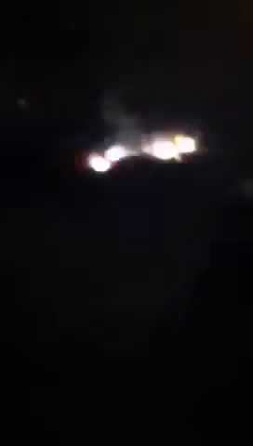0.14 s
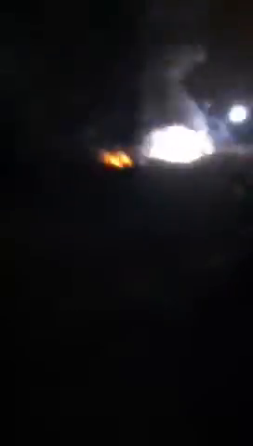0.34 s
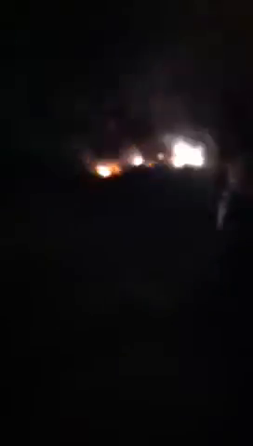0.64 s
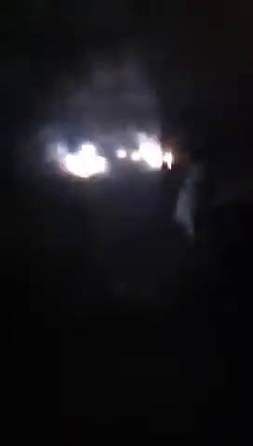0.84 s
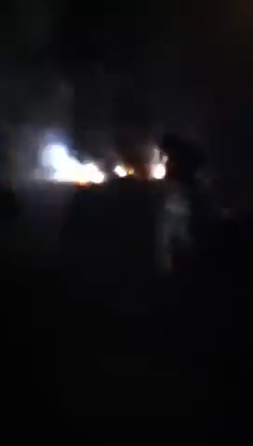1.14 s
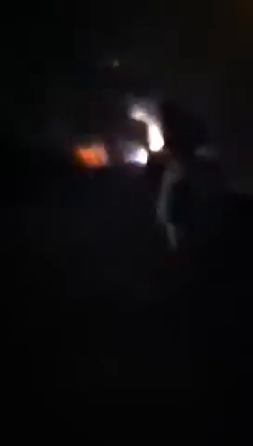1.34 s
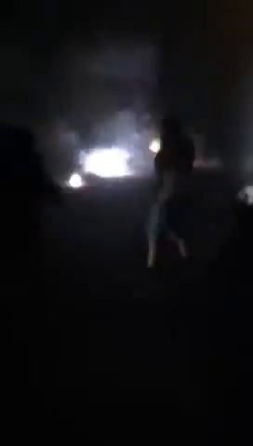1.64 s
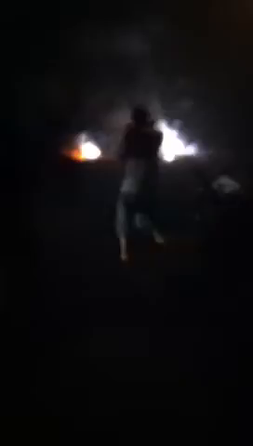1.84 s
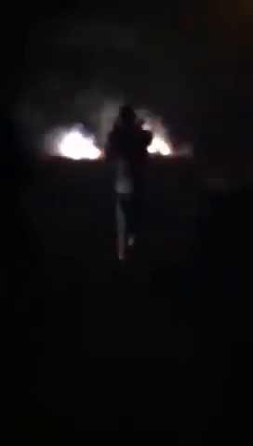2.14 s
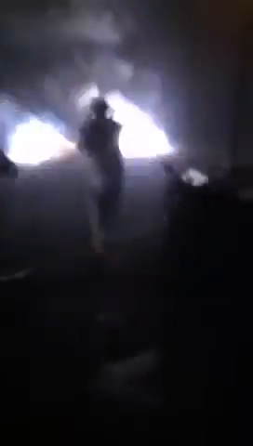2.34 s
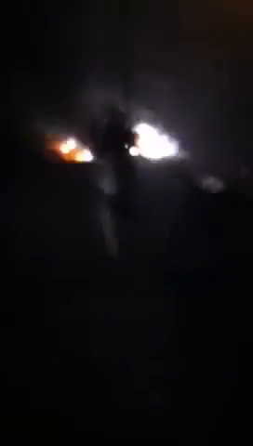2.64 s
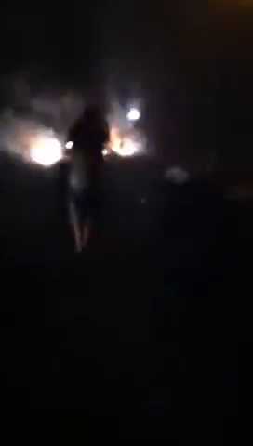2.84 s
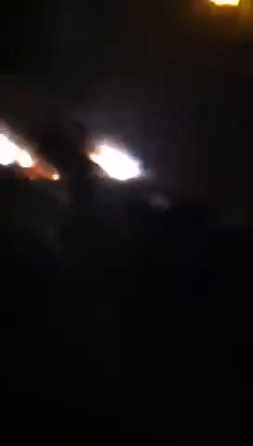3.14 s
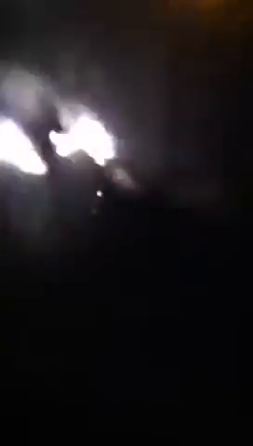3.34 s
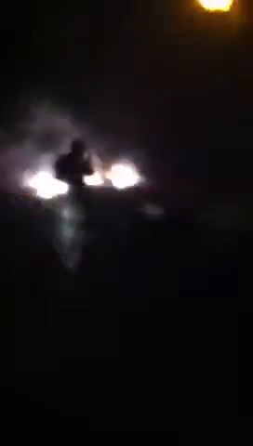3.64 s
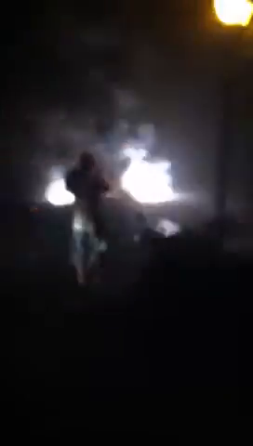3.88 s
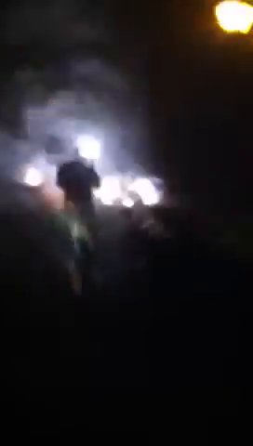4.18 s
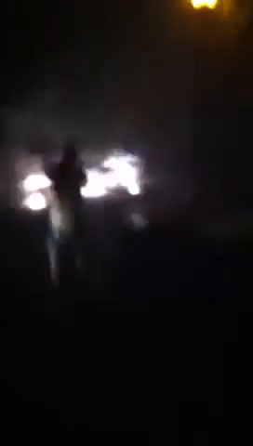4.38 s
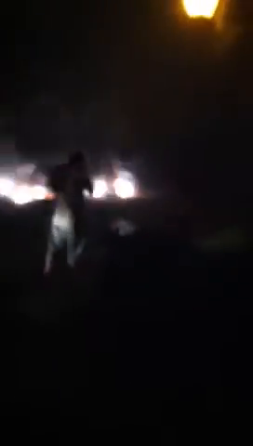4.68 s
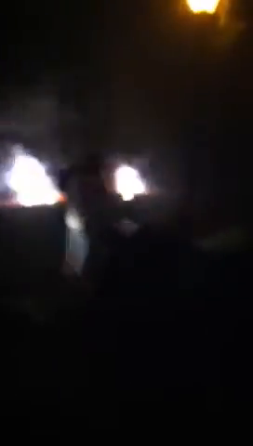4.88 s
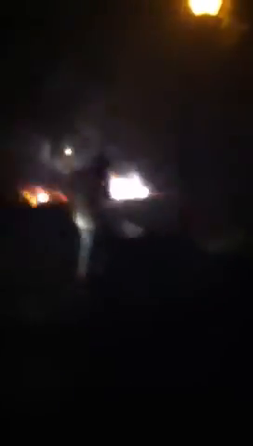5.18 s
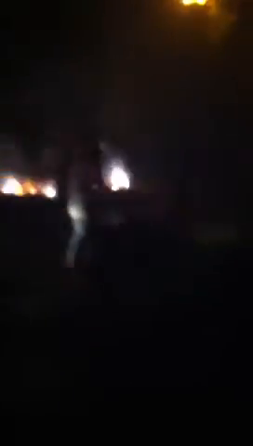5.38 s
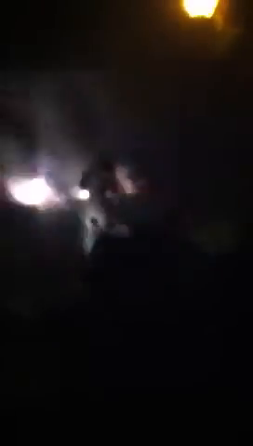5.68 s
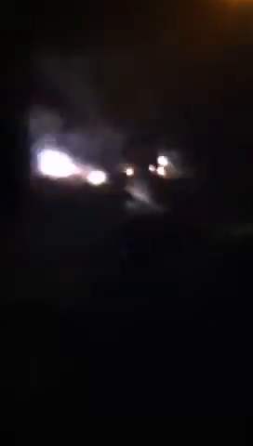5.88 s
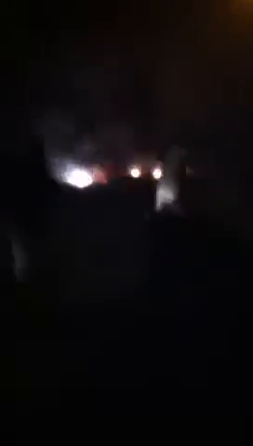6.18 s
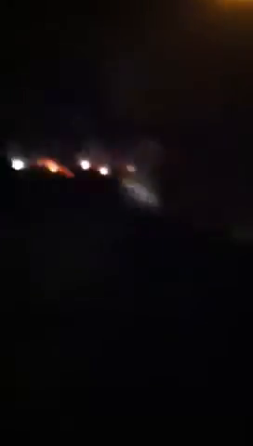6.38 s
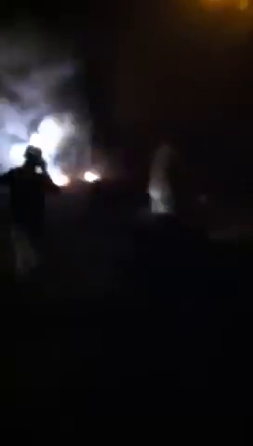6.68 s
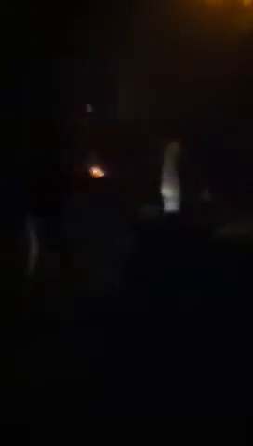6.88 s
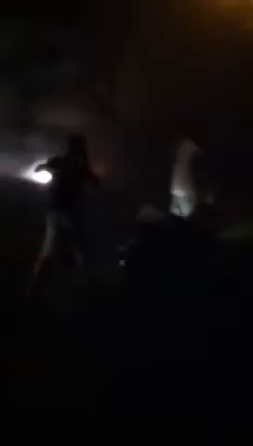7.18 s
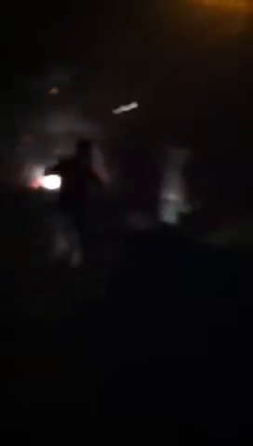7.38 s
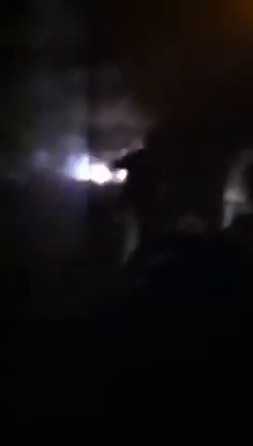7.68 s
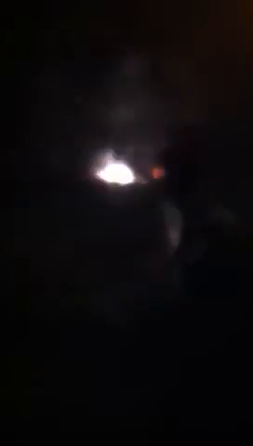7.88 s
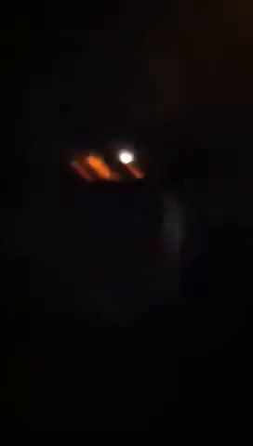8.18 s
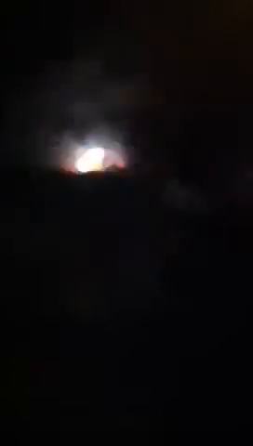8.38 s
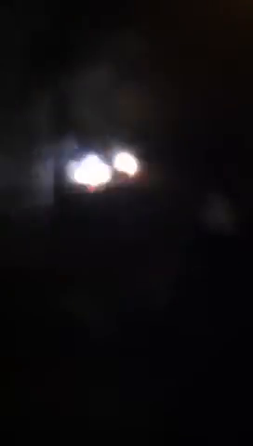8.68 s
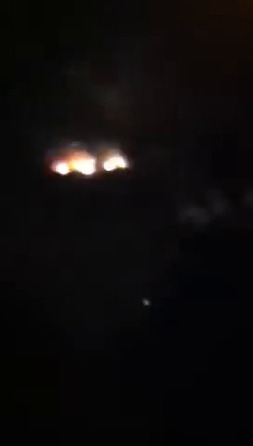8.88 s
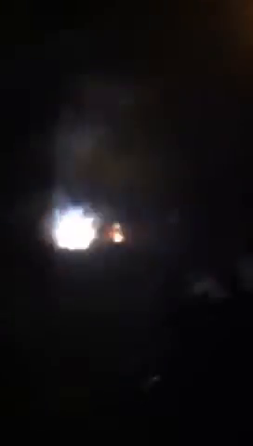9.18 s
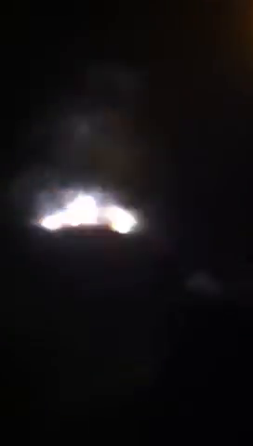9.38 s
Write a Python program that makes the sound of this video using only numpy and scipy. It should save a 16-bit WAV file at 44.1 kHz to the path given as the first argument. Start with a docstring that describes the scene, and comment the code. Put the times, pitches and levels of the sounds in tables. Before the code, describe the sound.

The sound starts at full intensity: a long firecracker string burning close by on open night ground. From 0 to 6 seconds countless cracks merge into a dense, fluttering roar, with heavy blasts and uneven low lumps of pressure. The overdriven microphone clips harshly and repeatedly chokes, leaving short ragged holes, several within the first second, a longer one around 3.5 to 3.67, and many between 4.5 and 5.3, with bangs bursting back through. Clumps of explosions surge near 3.2, 4.4, 4.8 and 5.1. From about 6 to 6.5 the heavy mass drops away; sharp single bangs then follow in quick, irregular succession over a quieter, more distant echoing wash until 8.5. Around 8.8 sharp cracks multiply and the tone darkens. The fire falters very briefly at 9.0, then crackling resumes until the abrupt end near 9.5.

```python
"""Firecrackers: a very long string burns close by on open ground.
Each bang is a shock spike and a suction lobe with a ground bounce and a short spray of scattered sound.
Many smaller cracks, heavy blasts and shaped noise for merged echoes fill in a roar.
The overdriven microphone clips, blocks after deep suctions and at listed times chokes."""
import sys
import numpy as np
from scipy import signal
from scipy.fft import rfft, irfft, next_fast_len
from scipy.io import wavfile
from scipy.ndimage import map_coordinates

SR = 44100
rng = np.random.default_rng(int(sys.argv[2]) if len(sys.argv) > 2 else 0)


def log_audio(samples):
    """Write samples as a 16-bit WAV file to the path given in sys.argv[1]."""
    # one column per channel
    frames = np.atleast_2d(samples).T
    # limit to full scale, then quantise
    limited = np.clip(frames, -1, 1)
    pcm = np.round(limited * 32767).astype(np.int16)
    wavfile.write(sys.argv[1], SR, pcm)


N = 420273


def amp(db):
    """Amplitude factor of a level in dB."""
    return 10 ** (np.asarray(db) / 20)


def unit(x):
    """x scaled to rms 1."""
    return x / np.sqrt(np.mean(x ** 2) + 1e-20)


def curves(rows):
    """One value per sample for each column after the time."""
    time_s, *columns = np.transpose(rows)
    t = np.arange(N) / SR
    return [np.interp(t, time_s, column) for column in columns]


def wobble(knots_per_s):
    """Smooth random curve through normally distributed knots."""
    knots = rng.standard_normal(int(N * knots_per_s / SR) + 4)
    return map_coordinates(knots, [np.arange(N) * knots_per_s / SR])


def along(points, hz):
    """Gain of (frequency [Hz], level [dB]) points, read on a log axis."""
    point_hz, db = np.transpose(points)
    return amp(np.interp(np.log(hz + 1), np.log(point_hz), db))


def filtered(x, response):
    """x with its spectrum multiplied by response(hz)."""
    size = next_fast_len(N + 8192)
    spectrum = rfft(x, size) * response(np.fft.rfftfreq(size, 1 / SR))
    return irfft(spectrum, size)[:N]


def noise(points):
    """Noise of rms 1, shaped by (frequency [Hz], level [dB]) points."""
    return unit(filtered(rng.standard_normal(N), lambda hz: along(points, hz)))


def saturate(x, top, hardness):
    """Rounded clipping at plus and minus top."""
    return x / (1 + np.abs(x / top) ** hardness) ** (1 / hardness)


def lag(x, ms):
    """One-pole smoothing with a time constant in ms."""
    keep = np.exp(-1000 / (ms * SR))
    return signal.lfilter([1 - keep], [1, -keep], x)


def add(track, time_s, sound):
    """Mix a sound into the track at a time."""
    start = int(np.clip(round(time_s * SR), 0, N))
    track[start:start + len(sound)] += sound[:N - start]


STRAY_DB, STRAY_SUCTION_MS = -4.2, 0.26  # mean level before near gain, median suction
NEAR_GAIN_DB = 6


def near_bangs(stray_per_s):
    """The closest crackers stand out singly: listed bangs, clumps and random sharp strays."""
    strays = volley(stray_per_s, np.full(N, STRAY_DB), spread_db=2.7, suction_ms=STRAY_SUCTION_MS)
    rows = placed_bangs() + clump_bangs() + list(strays)
    pressure = blasts(rows, shock_ms=0.14, suction=1.0, rebound=0.029, ground=0.13,
                      scatter_db=-18.5, scatter_ms=3.5)
    return amp(NEAR_GAIN_DB) * pressure


# nearest single bangs: (time [s], level before near gain [dB], suction [ms])
NEAR_BANGS = [(0.0046, -3.5, 9.1), (0.0579, -3, 0.69), (0.1022, -10, 1.2), (0.1349, -11, 0.57),
              (0.155, -14.5, .1), (0.2386, -6, 1.9), (0.5035, -5, 2), (0.7208, -13, 0.66),
              (0.7708, -6, 1.3), (0.7809, -4, .2), (0.8127, 5, 0.75), (1.1447, 2, 3.6), (1.5214, 2, .6),
              (1.8823, 0, 1.7), (2.1492, 2, 3.4), (3.391, 6, 1.1), (3.5453, -3.5, .1), (3.5942, -4.5, .1),
              (3.8787, -9, 3), (4.2893, -2, 2.4), (4.4897, -9, .1), (4.506, -22, .1), (4.522, -4, .1),
              (4.536, -9, .1), (4.7227, -7, 2.8), (5.4877, -7, 2.6), (5.5118, -3, 5.9), (5.6224, -6, 3.1),
              (5.7372, -3, 5.7), (5.8923, 1.5, 3.9), (6.2043, -3, 1.2), (6.2154, 2, 3.8), (6.2747, 1, 2.8),
              (6.3301, -5, 2), (6.3727, -4.5, 2.3), (6.5239, -8, 0.66), (6.5646, -4, 5), (6.5983, -7, 1.6),
              (6.6284, -2.5, 1.2), (6.6415, -2, 1.1), (6.7209, -13, 1.3), (6.7531, -4, 1.7),
              (6.7609, 2, 0.5), (6.8279, -4, 1), (6.8558, -11, 0.31), (6.9086, 4, 1.23), (6.9997, -4, 0.52),
              (7.0572, -5, 0.48), (7.1407, -3, 0.42), (7.1661, 6, 1.4), (7.2373, -1, 1.15),
              (7.2857, 1, 0.91), (7.3631, -4, 1.4), (7.4116, 3, .4), (7.4453, 1, 0.42), (7.5305, -13, 2.3),
              (7.5976, -8, 2.7), (7.6635, -3, 2.5), (7.7027, -1.5, 0.52), (7.7467, -9, 1.1),
              (7.7574, 3.5, 2.6), (7.836, -5, 5.5), (7.8578, -7, 1.84), (7.9209, -6, 9.6), (7.9536, -10, 2),
              (7.9638, -5, 2.5), (8.0026, -6, 0.79), (8.0662, -5, 1.3), (8.1188, 3, 1.1),
              (8.1433, -1, 0.58), (8.1772, -13, 0.89), (8.2601, -1, 0.85), (8.2947, -2.5, 8.6),
              (8.4371, -4, 3), (8.4521, -3, 0.71), (8.5182, -4.5, 5.2), (8.5537, 3, 2.7), (8.6492, 0, 0.98),
              (8.6743, -10, 1.4), (8.6946, -3, 4.9), (8.7199, -5, 1.3), (8.7595, -4, 3), (8.7691, -9, 1.7),
              (8.8381, -1, 0.98), (8.8591, 1, 0.8), (8.9087, 2, 0.75), (8.9447, 0, 0.99),
              (9.0553, -8, 0.063), (9.0911, -1, .6), (9.1525, -4, 1.3), (9.24, -9, 1.3), (9.3365, 3, 0.8),
              (9.42, 0, .4), (9.4495, 1, 1.4), (9.4569, -11, 1.2), (9.495, -7, 0.52)]
FREEING_DELAY_S, FREEING_DB, FREEING_SUCTION_MS = 0.00101, -4.5, 0.93  # bang just after each choke


def placed_bangs():
    """The listed nearest bangs, and one as the microphone comes free of each choke."""
    freeing = [(end_s + FREEING_DELAY_S, FREEING_DB, FREEING_SUCTION_MS) for _, end_s in CHOKE_SPANS]
    return list(NEAR_BANGS) + freeing


# clumps of crackers that catch at once: (time [s], length [s], relative strength [dB])
CLUMP_RUNS = [(0.058, .045, 0), (0.522, .03, 0.5), (0.896, .06, 0), (2.582, .03, -1), (3.209, .1, 2),
              (3.409, .03, -1), (3.67, .03, -1), (3.955, 0.013, -1), (4.384, .09, 0), (4.82, .15, 2),
              (5.096, .15, 0.5), (5.285, .045, 1.5), (6.031, 0.088, -1.5), (8.083, .015, -1.5),
              (8.329, 0.049, -3), (8.587, .03, -0.5), (8.811, 0.034, -9)]
CLUMP_GAP_S, CLUMP_BANG_DB, CLUMP_SUCTION_MS = 0.012, -3.5, 1.53  # medians; level before near gain


def clump_bangs():
    """The flame runs through each clump, firing its crackers at uneven gaps."""
    rows = []
    for start_s, length_s, strength_db in CLUMP_RUNS:
        slip, size, charge = rng.standard_normal((3, 32))
        gap_s = CLUMP_GAP_S * np.exp(0.4 * slip)
        delay_s = np.cumsum(gap_s) - gap_s[0]
        level_db = CLUMP_BANG_DB + strength_db + 2.3 * size
        suction_ms = CLUMP_SUCTION_MS * np.exp(0.4 * charge)
        run = np.column_stack([start_s + delay_s, level_db, suction_ms])
        rows.extend(run[delay_s < length_s])
    return rows


def blasts(rows, shock_ms, suction, rebound, ground, scatter_db, scatter_ms):
    """Pressure of (time [s], level [dB], suction [ms]) bangs with ground bounce and scattered spray."""
    direct, spray_power = np.zeros(N), np.zeros(N)
    ms = np.arange(SR // 25) * 1000 / SR
    front = 1 - np.exp(-ms / 0.035)
    spray_shape = (1 - np.exp(-ms)) * np.exp(-ms / scatter_ms)
    for (time_s, db, suction_ms), (width, path) in zip(rows, rng.random((len(rows), 2))):
        # shock width varies from one to two times shock_ms
        shock = np.exp(-(ms / (shock_ms * (1 + width))) ** 4)
        # the gas overshoots into a suction, then swings back once
        age = ms / (shock_ms + suction_ms)
        swing = rebound * np.exp(-(age - 2) ** 2 * 2) - suction * np.exp(-age ** 4)
        wave = amp(db) * (shock * front + (1 - shock) * swing)
        bounce_delay_s = 0.0004 + 0.00305 * path
        add(direct, time_s, wave)
        add(direct, time_s + bounce_delay_s, ground * wave)
        add(spray_power, time_s, amp(2 * db) * spray_shape)
    return direct + amp(scatter_db) * np.sqrt(spray_power) * noise(ROAR_SPECTRUM)


def volley(rate_per_s, db, spread_db, suction_ms):
    """Random bangs at a changing rate and level; louder ones tend to longer suctions."""
    at = np.flatnonzero(rng.random(N) < rate_per_s / SR)
    size, charge = rng.standard_normal((len(at), 2)).T
    level_db = db[at] + spread_db * size
    lengths_ms = suction_ms * np.exp(0.26 * size + 0.54 * charge)
    return np.column_stack([at / SR, level_db, lengths_ms])


def crackle(roar_db):
    """Small crackers: the fiercer the fire, the more and the louder."""
    rate_per_s = 280 * amp(1.8 * (roar_db + 15))
    rows = volley(rate_per_s, 1.054 * roar_db + 13, spread_db=3.5, suction_ms=0.33)
    return blasts(rows, shock_ms=0.18, suction=0.94, rebound=0.063, ground=0.35,
                  scatter_db=-14.5, scatter_ms=3.1)


def heavy_blasts(heavy_db):
    """Larger blasts with wide shocks and a suction deeper than the shock."""
    rate_per_s = 32 * amp(3.2 * (heavy_db + 17))
    rows = volley(rate_per_s, 0.24 * heavy_db + 6, spread_db=6.0, suction_ms=1.32)
    return blasts(rows, shock_ms=0.62, suction=1.22, rebound=0.1, ground=0.14,
                  scatter_db=-31, scatter_ms=8.9)


# slow pressure swing of many blasts together: (frequency [Hz], relative density [dB per Hz])
SURGE_SPECTRUM = [(20, -14), (60, 10), (110, -10), (170, 2), (280, -4.5), (500, -12), (1500, -45)]


def surge(heavy_db):
    """Blasts pile up into low, uneven lumps of pressure, strongest in the heaviest volleys."""
    lumps_db = 4 * wobble(60)
    return amp(2.116 * heavy_db + 20.5 + lumps_db) * noise(SURGE_SPECTRUM)


# merged cracks and echoes: (frequency [Hz], relative density [dB per Hz])
ROAR_SPECTRUM = [(100, -0.5), (200, 5), (500, -8.5), (900, -3.5), (1500, -0.5), (2200, -9.5), (3000, -9.5),
                 (4000, -13.5), (5500, -10), (8000, -13), (10500, -14.5), (13000, -17), (16000, -20)]
# return from the surroundings: (frequency [Hz], relative density [dB per Hz])
ECHO_SPECTRUM = [(100, -18), (200, -15), (500, -4), (900, 0.5), (1500, -1), (2200, 2), (3000, -2),
                 (4300, -9), (6000, -6), (8000, -6), (10500, -10), (13000, -14), (16000, -34)]
# distant echo in the roar: (time [s], power share [0-1])
DISTANT_SHARE = [(0, 0.1), (5.6, 0.21), (6.5, 0.64), (8.4, 1), (9.5, 0.6)]


def roar(roar_db):
    """Noise for countless overlapping cracks and echoes, fluttering in level."""
    share = curves(DISTANT_SHARE)[0]
    wash = np.sqrt(1 - share) * noise(ROAR_SPECTRUM) + np.sqrt(share) * noise(ECHO_SPECTRUM)
    flutter_db = 1.1 * wobble(50) + 1.5 * wobble(300)
    return amp(roar_db - 1.5 + flutter_db) * wash


# fierceness of the fire:
# (time [s], roar control [dB], heavy-blast control [dB], sharp near cracks [per s])
BLAZE_COURSE = [(0, -15, -16, 17), (0.6, -14.5, -16.5, 13.5), (0.8, -16.5, -21, 15),
                (1.0, -14.3, -18.5, 14.3), (1.8, -14.5, -21.5, 16.6), (3.1, -14.3, -19, 18.3),
                (3.7, -16, -18.5, 15.5), (4.2, -14, -17.5, 15), (4.8, -15, -17.5, 14.7),
                (5.2, -16.5, -20, 19.5), (5.45, -15, -20.5, 24), (6.0, -17.5, -18.5, 33.7),
                (6.5, -24, -39, 38), (7.55, -25.5, -36, 14.65), (8.5, -25, -37, 30), (8.8, -19.5, -34, 67),
                (9.2, -20.5, -33, 71), (9.53, -21.5, -25, 48)]
# the fuse falters: (start [s], end [s])
LULL_SPAN = (8.97, 9.06)
LULL_FADE_DB_PER_S = 95  # roar control; the heavy-blast control fades twice as fast
CLUMP_HEAVY_DB, CLUMP_DUCK_DB = -15, 2.5  # heavy control at a clump's height; roar control gives way
CLUMP_EDGE_S = 0.015


def burning():
    """Roar and heavy-blast controls and stray rate: the blaze, shaped by its clumps and its lull."""
    t = np.arange(N) / SR
    roar_db, heavy_db, stray_per_s = curves(BLAZE_COURSE)
    for start_s, length_s, strength_db in CLUMP_RUNS:
        end_s = start_s + length_s
        corners_s = [start_s - CLUMP_EDGE_S, start_s, end_s, end_s + CLUMP_EDGE_S]
        swell = np.interp(t, corners_s, [0, 1, 1, 0])
        heavy_db = heavy_db + swell * (CLUMP_HEAVY_DB + strength_db - heavy_db)
        roar_db = roar_db - swell * CLUMP_DUCK_DB
    lull_start_s, lull_end_s = LULL_SPAN
    lull = (t > lull_start_s) & (t < lull_end_s)
    fade_db = LULL_FADE_DB_PER_S * (t - lull_start_s) * lull
    return roar_db - fade_db, heavy_db - 2 * fade_db, stray_per_s * ~lull


def scene():
    """Sum of all pressures at the microphone, one channel."""
    roar_db, heavy_db, stray_per_s = burning()
    roar_db = roar_db + 0.7 * wobble(11)
    pressure = near_bangs(stray_per_s) + crackle(roar_db) + heavy_blasts(heavy_db)
    pressure = pressure + surge(heavy_db) + roar(roar_db)
    return pressure[None]


# overload pins the microphone at its lower limit: (start [s], end [s])
CHOKE_SPANS = [(0.044, 0.057), (0.108, 0.127), (0.143, 0.198), (0.511, 0.525), (0.628, 0.633),
               (0.723, 0.761), (0.772, 0.797), (0.846, 0.894), (1.313, 1.359), (1.528, 1.538),
               (1.866, 1.871), (2.115, 2.122), (2.877, 2.883), (3.207, 3.214), (3.272, 3.281),
               (3.484, 3.67), (3.81, 3.863), (4.087, 4.099), (4.474, 4.571), (4.652, 4.699), (4.768, 4.818),
               (4.897, 4.907), (5.022, 5.065), (5.134, 5.152), (5.241, 5.284), (5.612, 5.621),
               (6.126, 6.165), (6.911, 6.921), (8.18, 8.228)]
RAIL = 0.71  # microphone swing limit
CHOKE_EDGE_MS, CHOKE_EDGE_DB, SHOCK_THROUGH_DB = 2.53, -26.5, 4.5
RECOVER_MS = 14


def choke(pressure, bias_depth, blocking, block_ms):
    """A choked microphone rests on its lower limit, edges softened by faint sound; listed bangs pierce it."""
    held, shocks = np.zeros(N), np.zeros(N)
    for start_s, end_s in CHOKE_SPANS:
        held[round(start_s * SR):round(end_s * SR)] = 1
    for time_s, db, _ in placed_bangs():
        add(shocks, time_s, amp(db + SHOCK_THROUGH_DB) * np.hanning(9))
    # bias creeps back after a choke: first sounds come through in shreds
    bias = bias_depth * lag(held, RECOVER_MS)
    # suction beyond the limit blocks for a few ms
    blocked = blocking * lag(np.maximum(-pressure - RAIL, 0), block_ms)
    free = saturate(pressure - bias * (1 - shocks) - blocked, RAIL, hardness=2.6)
    # soft edges: faint sound fades out after the start and in before the end
    edges = lag(1 - held, CHOKE_EDGE_MS) + lag(1 - held[::-1], CHOKE_EDGE_MS)[::-1]
    soft_edges = amp(CHOKE_EDGE_DB) * edges * np.tanh(pressure)
    return (1 - held) * free + held * (shocks + soft_edges - RAIL)


# the tone darkens near the end: (time [s], share of dark tone [0-1])
DARK_SHARE = [(0, 0.02), (8.3, 0.1), (8.8, 0.4), (9.1, 0.9), (9.54, 0.9)]
# the darker tone: (frequency [Hz], gain [dB])
DARK_RESPONSE = [(200, 3.5), (900, -0.5), (2200, 2.5), (3500, 2), (7000, -1.5), (10000, -9.5), (16000, -1)]
BASS_CUT_HZ, ROLLOFF_HZ, TOP_HZ = 132, 11300, 16000


def record(dry):
    """Overloaded microphone, bass cut that rings after jumps, tone, second clip, faint noise, band limit."""
    x = choke(dry[0], bias_depth=1.7, blocking=1.88, block_ms=3.23)
    bass_cut = signal.butter(4, BASS_CUT_HZ, "highpass", fs=SR, output="sos")
    x = signal.sosfilt(bass_cut, x)
    share = curves(DARK_SHARE)[0]
    dark = filtered(x, lambda hz: along(DARK_RESPONSE, hz))
    x = (1 - share) * x + share * dark
    x = amp(-0.5) * filtered(x, lambda hz: 1 / np.sqrt(1 + (hz / ROLLOFF_HZ) ** 14))
    x = saturate(x, top=0.73, hardness=7) + amp(-68) * noise(ROAR_SPECTRUM)
    return filtered(x, lambda hz: hz < TOP_HZ)[None]


dry = scene()
out = record(dry)
log_audio(out)
```